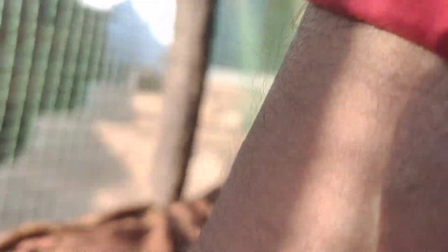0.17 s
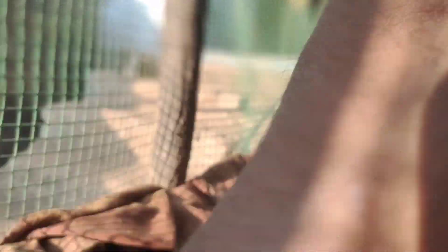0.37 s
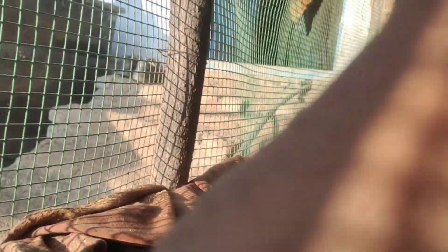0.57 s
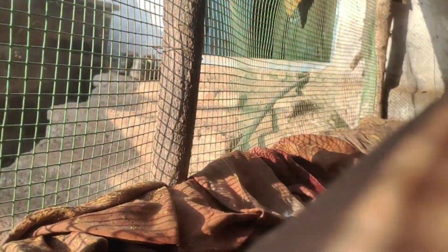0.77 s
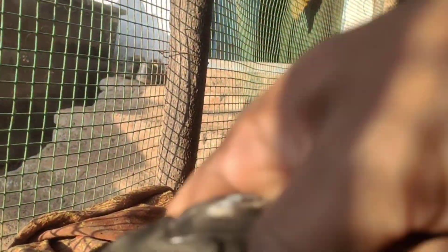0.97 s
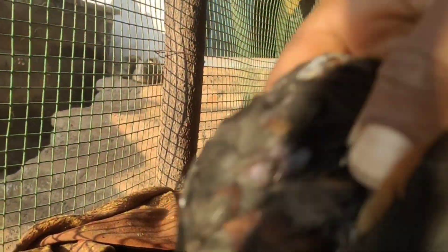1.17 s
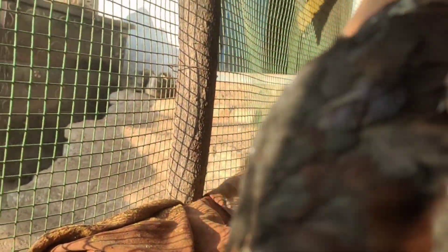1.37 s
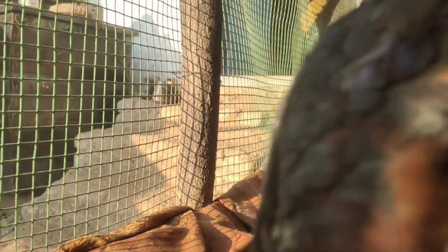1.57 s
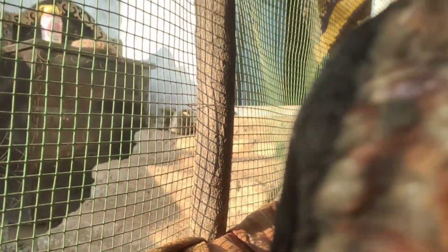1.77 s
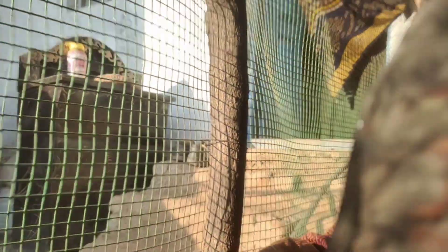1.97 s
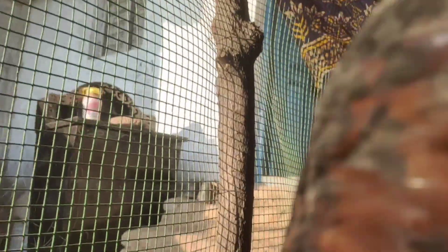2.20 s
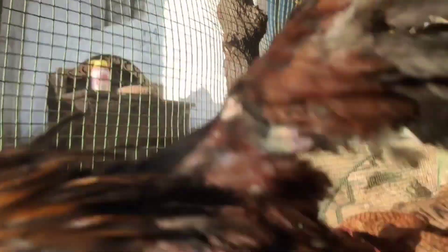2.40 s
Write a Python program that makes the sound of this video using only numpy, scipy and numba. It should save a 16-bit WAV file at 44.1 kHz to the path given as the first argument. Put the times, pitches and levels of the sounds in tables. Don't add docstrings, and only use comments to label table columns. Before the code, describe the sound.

A young hen, very close, gives six short soft clucks from 0 to 1 s amid grainy cloth and feather scrapes and tiny claw ticks. Lifted, it squawks at 1.07-1.3, a sharp wooden knock and hoarse cluck follow at 1.4, then a long rasp at 1.5-1.7. The loudest squawk comes at 1.84-2.1, then a croak and falling squawk until 2.4, ending in rustle. Breath puffs, faint birds, dry yard hiss.

```python
import sys
import numpy as np
from scipy import signal
from scipy.io import wavfile
from scipy.ndimage import uniform_filter1d, map_coordinates
from numba import njit

SR = 44100
rng = np.random.default_rng(int(sys.argv[2]) if len(sys.argv) > 2 else 0)


def file_out(sig):
    cols = np.atleast_2d(sig).T
    lim = np.clip(cols, -1, 1)
    pcm = np.round(lim * 32767).astype(np.int16)
    wavfile.write(sys.argv[1], SR, pcm)


def volts(x):
    e = np.asarray(x, float) / 20
    return 10 ** e


N = 107559

# (time_s, pitch_hz, level_db, roughness 0-1)
CLUCKS = [
    [(0, 654, -11.5, 0.22), (.014, 670, -19, 0.05), (.024, 623, -30, 0.08)],
    [(.178, 441.5, -28, 0.2), (.187, 570, -19.5, 0.13), (.196, 701.6, -15, 0), (.216, 689, -17.5, 0.01),
     (.224, 581, -27, 0.5), (.24, 526, -53, 0.16)],
    [(.32, 478.4, -24, 0), (.326, 588, -20.5, 0), (.343, 670, -15.5, 0.1), (.351, 576, -22, 0.39),
     (.368, 577, -19, 0.2), (.38, 580, -112, .1)],
    [(.593, 480, -49, 0.03), (.6, 521, -24.5, 0), (.61, 566, -30, 0.08), (.627, 568.6, -26, 0.14),
     (.637, 482, -28, 0.2), (.645, 462.5, -63, 0.04)],
    [(.758, 474, -49, 0.07), (.764, 509.7, -23.5, 0.16), (.773, 586.5, -26.5, 0.1), (.786, 631, -20, 0.09),
     (.796, 579.4, -30.5, 0.2), (.818, 548.3, -33, 0.65)],
    [(.896, 604.7, -39, 0.09), (.902, 590, -24.5, 0.2), (.915, 644, -17.5, 0), (.919, 786, -20, 0.18),
     (.942, 794, -21, 0), (.947, 610, -23, 0.02), (.96, 580.4, -28, 0.14), (.985, 611, -37.5, 0.54)],
]
# time_s, pitch_hz, level_db, roughness 0-1
MURMUR = [(1.418, 430.1, -14, 0.69), (1.428, 447.6, -27.5, .9), (1.44, 523, -29, 0.94),
          (1.456, 571.4, -23.5, 0.55), (1.468, 559.5, -30, .9), (1.487, 601.8, -34, 1)]
# (time_s, pitch_hz, level_db, roughness 0-1, beak_hz)
FIRST_SQUAWKS = [
    [(1.066, 474.7, -23, 0.1, 1085), (1.072, 634.7, -17.5, 0.054, 1387), (1.083, 880.5, -11, 0.022, 1695),
     (1.097, 790.3, -11, 0.39, 1800), (1.11, 675.5, -14, 0.45, 1910), (1.165, 659, -16.5, 0.51, 1740),
     (1.182, 763.6, -12, 0.024, 1577), (1.212, 778, -9.5, 0.033, 1625), (1.228, 816, -12.5, 0.74, 1660)],
    [(1.24, 766.6, -11.5, 0.06, 1430), (1.272, 679.6, -14, 0.25, 1350), (1.293, 536, -30, 0.6, 1203)],
    [(1.497, 605.8, -13, 0.5, 1201), (1.501, 616.8, -11, 0.85, 1302), (1.523, 717.8, -12.5, 0.35, 1533),
     (1.55, 694, -16, 0.24, 1580), (1.605, 699.4, -17.5, 0.38, 1480), (1.62, 703.5, -15, 0.68, 1759),
     (1.65, 638.4, -13.5, 0.92, 1909), (1.69, 634.2, -17.5, 0.55, 1321), (1.7, 602.4, -67, 0.38, 1277)],
]
LAST_SQUAWKS = [
    [(1.838, 558.2, -14, 0.26, 1218), (1.85, 630.5, -15.5, 0.045, 1292), (1.862, 889.7, -8.5, 0.019, 1766),
     (1.878, 924.8, -10.5, 0.056, 1859), (1.895, 749.7, -13, 0.55, 1882), (1.96, 719.9, -11.5, 0.71, 1802),
     (2.0, 689.3, -10.5, 0.43, 2038), (2.065, 738, -14, 0.86, 1556), (2.088, 679, -18, 0.91, 1410),
     (2.103, 610.5, -45, 0.54, 1273)],
    [(2.162, 618.4, -23, 0.67, 1270), (2.167, 620, -23.5, 0.7, 1396), (2.185, 612.3, -23, 0.7, 1400),
     (2.198, 613.9, -16.5, 0.74, 1388), (2.212, 590.9, -18, 0.71, 1300)],
    [(2.221, 732.8, -42, 0.51, 1460), (2.2235, 750, -12.5, 0.45, 1530), (2.243, 773.4, -11.5, 0.18, 1500),
     (2.27, 874.8, -17, 0.52, 1860), (2.34, 577.8, -17, 0.46, 1710), (2.395, 583.4, -16.5, 0.62, 1516),
     (2.425, 541.4, -32.5, 0.52, 1192)],
]
# resonance_hz, width_hz, level_db
WINDPIPE = [(2970, 800, -7.5)]
# time_s, resonance_hz, resonance_db, airy_treble_db
GAPE = [(0, 4100, -37, -29), (.95, 3040, -2, -42), (1.08, 4950, -19, -34), (1.15, 5000, -17.5, -30.5),
        (1.2, 4682, -9.5, -28), (1.29, 4290, -5, -15.5), (1.5, 4153, -23, -27), (1.58, 4160, -11, -19.5),
        (1.65, 4640, -8, -24.5), (1.86, 4626, -16.5, -38), (1.9, 5769, -19, -27), (2.1, 6290, -16, -26.5),
        (2.16, 4203, -47, -9), (2.222, 4253, -9, -26.5), (2.3, 4280, -9, -40), (2.4, 3780, -20, -50)]
# time_s, left_port_lag_ms, left_port_level_db
BEARING = [(0, 0.24, -2.5), (.9, 0.2, 2.3), (1.08, 0.26, -1.5), (1.25, .25, -4), (1.49, 0.13, -1.5),
           (1.57, .16, -4), (1.66, .23, -5), (1.85, 0.35, -8), (1.92, 0.39, -19), (1.97, 0.28, -16),
           (2.03, 0.26, -7.5), (2.12, 0.3, -4), (2.16, 0.38, -30), (2.212, .36, -36), (2.221, 0.41, -4),
           (2.4, 0.31, -5)]
# start_s, length_s, level_db
BREATH_GUSTS = [(1.21, 0.053, -20.5), (1.511, 0.026, -25), (1.63, 0.036, -31.5), (1.915, 0.15, -19),
                (2.229, 0.014, -18), (2.239, 0.01295, -14.5), (2.269, 0.015, -19), (0.827, 0.026, -37),
                (0.951, .04, -34), (1.421, 0.061, -29.5), (2.164, 0.053, -30), (2.299, 0.046, -44.5)]
# pitch_hz, level_db, t60_s
WOOD_MODES = [(415.3, 0.00047, 0.088)]
# start_s, level_db
SCRAPES = [(0.085, -29.5), (0.142, -29.5), (0.1916, -15), (0.2288, -17), (0.263, -33), (0.4166, -28),
           (0.4554, -18.5), (.5, -35), (0.5407, -23), (0.574, -21), (0.7012, -24.5), (0.7503, -23.5),
           (0.864, -18), (1.0179, -20.5), (1.3344, -19.5), (1.43, -19.5), (1.769, -25), (2.18, -18.5),
           (2.4002, -12.5)]
# frequency_hz, level_db
CLOTH_SPECTRUM = [(100, -18), (680, -3.5), (1000, -7.5), (1900, -15.5), (3200, -7.5), (6300, -12),
                  (15500, -6)]
# start_s, level_db, pitch_hz, decay_s
TICKS = [(.0533, -50, 3270, 0.0025), (0.0859, -28.5, 4860, 0.0061), (0.1418, -24.5, 2940, 0.0016),
         (0.1909, -26.5, 7300, 0.0025), (0.4554, -45, 8000, 0.0026), (0.4967, -32, 6500, 0.0038),
         (0.711, -26.5, 304, 0.0053), (.7507, -30, 6540, .003)]
# start_s, length_s, pitch_hz, level_db
PEEPS = [(2.108, .052, 2990, -35), (2.16, .025, 3000, -41), (.055, .09, 680, -35), (.07, .07, 1300, -43),
         (1.793, .045, 1030, -33), (1.352, .035, 675, -31), (1.3, .03, 1400, -35)]
# frequency_hz, level_db
YARD_SPECTRUM = [(60, -29), (385, 0), (870, -3), (1830, -6), (3000, -6), (6000, -14.5), (15500, -8.5)]


def level(x, db):
    return x * volts(db) / np.sqrt(np.mean(x ** 2))


@njit
def svf(x, hz, width):
    y, b, l = np.empty(len(x)), 0., 0.
    for i in range(len(x)):
        g, k = np.tan(np.pi * hz[i] / SR), width / hz[i]
        v = (b + g * (x[i] - l)) / (1 + g * (g + k))
        b, l, y[i] = 2 * v - b, l + 2 * g * v, k * v
    return y


def band(x, hz, width):
    return svf(x + 1e-18, np.zeros(len(x)) + hz, 1. * width)


def band_twice(x, hz, width):
    return band(band(x, hz, width), hz, width)


def walk(rate):
    k = int(SR / rate)
    steps = np.repeat(rng.standard_normal(N // k + 1), k)
    return 0.441 * uniform_filter1d(uniform_filter1d(steps, k), k)[:N]


def glide(t, table):
    times, *columns = np.transpose(table)
    return [np.interp(t, times, column) for column in columns]


def coloured(table, flicker_db, likeness_hz):
    out, (table_hz, table_db) = 0, np.transpose(table)
    for hz in 60 * 2 ** (np.arange(25) / 3):
        mid, side = (band_twice(rng.standard_normal(N), hz, hz / 3) for _ in range(2))
        db = np.interp(np.log(hz), np.log(table_hz), table_db) + flicker_db * walk(11.85)
        difference = min(hz / likeness_hz, 1) * side * np.array([[1], [-1]])
        out = out + volts(db) * (mid + difference)
    return level(out, 0)


@njit
def cycles(hz, rough, chance, jitter):
    phase, p = np.empty(len(hz)), 0.
    for i in range(len(hz)):
        p += hz[i] * max(1 + jitter * rough[i] * chance[int(p)], .3) / SR
        phase[i] = p
    return phase


def membrane(hz, rough):
    shimmer_db, half_beat_db, hiss_db = 4, 5, -5
    chance = rng.standard_normal((2, N // 10))
    phase = cycles(hz, rough, chance[0], .15)
    k = phase.astype(int)
    size = volts(rough * (shimmer_db * chance[1][k] + half_beat_db * (-1) ** k))
    clean = sum(np.cos(2 * np.pi * m * (phase - .5)) * (m * hz < 14000) for m in range(1, 19))
    hiss = volts(hiss_db) * 10 * rough * rng.standard_normal(N) * np.sin(np.pi * phase) ** 2
    return size * (clean + hiss)


def hen(t):
    clucks = [[row + (2 * row[1],) for row in call] for call in CLUCKS + [MURMUR]]
    calls = clucks + FIRST_SQUAWKS + LAST_SQUAWKS
    hz, db, rough, beak_hz = glide(t, sorted(sum(calls, [])))
    rough = np.clip(rough, 0, 1)
    sounding = sum((t >= c[0][0]) & (t < c[-1][0] + .015) for c in calls) > 0

    second = rough * membrane(hz * 1.46, rough)
    source = membrane(hz, rough) + volts(3) * second

    gape_hz, gape_db, air_db = glide(t, GAPE)
    windpipe = sum(volts(d) * band_twice(source, f, w) for f, w, d in WINDPIPE)
    gape = volts(gape_db) * band_twice(source, gape_hz, 1200)
    air = volts(air_db) * band_twice(source, 9260, 27000)
    bright_db_per_db = 1.03
    upper = (windpipe - gape + air) * volts(bright_db_per_db * (db + 9.5))

    beak = band_twice(source, beak_hz, 518)
    chest_db = -9 - .5 * np.clip(db + 20.5, -14, 0)
    chest = volts(chest_db) * band_twice(source, 720, 400)
    rasp = volts(-8) * band(second, 1150, 700)
    voice = beak + chest + upper - rasp
    voice = signal.sosfilt(signal.butter(6, 520, "high", fs=SR, output="sos"), voice)
    envelope = np.sqrt(uniform_filter1d(voice ** 2, size=400))
    return voice / envelope * volts(db) * sounding


def breath(t):
    puff_hz, puffs_per_s, edge_s = 255.6, 90, 0.0017
    gate = sum(volts(db) * np.clip(np.minimum(t - s, s + d - t) / edge_s, 0, 1) for s, d, db in BREATH_GUSTS)
    puffs = band(band(rng.standard_normal(N), puff_hz, 693.5), puff_hz, 728)
    puffs = puffs / np.sqrt(uniform_filter1d(puffs ** 2, size=500))
    flutter = np.sin(np.pi * np.cumsum(puffs_per_s * (1 + 0.807 * walk(40))) / SR) ** 2
    return gate * puffs * flutter


def knock(t):
    crack_db, crack_decay_s = -5.5, 0.0057
    age = np.maximum(t - 1.4083, 0)
    ring = sum(volts(db) * np.sin(2 * np.pi * f * age) * volts(-60 * age / min(t60, .2))
               for f, db, t60 in WOOD_MODES)
    crack = np.exp(-age / crack_decay_s) * (age > 0) * band(rng.standard_normal(N), 10240, 17500)
    return volts(-16) * ring / np.abs(ring).max() + volts(crack_db) * crack


def rustle(t):
    attack_s, decay_s, cloth_db, grain_db = 0.0047, 0.045, -5.5, 3.5
    swell = 0
    for start, db in SCRAPES:
        rise = np.clip((t - start) / attack_s, 0, 1)
        swell = swell + volts(db) * rise * np.exp(-np.maximum(t - start, 0) / decay_s)
    return swell * volts(cloth_db + grain_db * walk(300)) * coloured(CLOTH_SPECTRUM, 3.5, 1300)


def ticks(t):
    noise, out = rng.standard_normal(N), 0
    for start, db, hz, decay_s in TICKS:
        decay = (t > start) * np.exp(-np.maximum(t - start, 0) / decay_s)
        out = out + volts(db) * decay * level(band(noise, hz, 0.26 * hz), 0)
    return out


def flock(t):
    wobble_s = np.cumsum(1 + .006 * walk(90)) / SR
    return sum(volts(db) * np.sin(np.pi * np.clip((t - s) / d, 0, 1)) ** .5 * np.sin(2 * np.pi * f * wobble_s)
               for s, d, f, db in PEEPS)


def coop_echo(x):
    t60_s, echo_db, length = 0.061, -7, 6000
    tail = rng.standard_normal((2, length)) * volts(-60 * np.arange(length) / SR / t60_s)
    return np.array([signal.fftconvolve(x, level(h, echo_db) / np.sqrt(length))[:N] for h in tail])


def hollow():
    return np.array([level(band(rng.standard_normal(N), 670, 70) * volts(1.7 * walk(21.2)), -40.5)
                     for _ in range(2)])


def yard():
    return volts(-34.5) * coloured(YARD_SPECTRUM, 1.3, 1130)


def scene():
    t = np.arange(N) / SR
    near = hen(t) + knock(t)
    lag_ms, left_db = glide(t, BEARING)
    late = map_coordinates(near, [(t - lag_ms / 1000) * SR], mode="nearest")
    dull = signal.lfilter(*signal.butter(3, 5050, fs=SR), late)
    direct = np.array([volts(left_db) * dull, near])
    puff = np.array([volts(-47) * breath(t), breath(t)])
    around = yard() + hollow() + rustle(t)

    release = 0.038 * SR
    loud = signal.lfilter([1], [release, 1 - release], near ** 2)
    duck = (1 + loud / volts(2 * -24)) ** -.45
    return direct + coop_echo(dull) + puff + flock(t) + ticks(t) + around * duck


def top_cut(x):
    return signal.sosfilt(signal.butter(12, 16380, fs=SR, output="sos"), x)


def record(dry):
    shelf_hz, shelf_db, left_port_hz, top_hz = 7400, -11, 8600, 15300
    x = signal.sosfilt(signal.butter(4, 85, "high", fs=SR, output="sos"), dry)
    x = x + volts(5) * np.array([band(c, 6350, 1200) for c in x])
    below = signal.sosfiltfilt(signal.butter(4, shelf_hz, fs=SR, output="sos"), x)
    x = volts(shelf_db) * x + (1 - volts(shelf_db)) * below
    x = np.array([signal.lfilter(*signal.butter(1, left_port_hz, fs=SR), x[0]), x[1]])
    limited = np.tanh(x * 1.066)
    x = signal.sosfilt(signal.butter(14, top_hz, fs=SR, output="sos"), limited)
    x = 1.034 * signal.sosfilt(signal.butter(2, 70, "high", fs=SR, output="sos"), x)
    return top_cut(x)


dry = scene()
out = record(dry)
file_out(out)
```